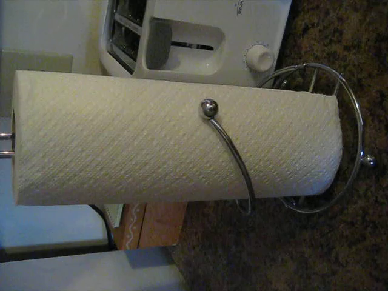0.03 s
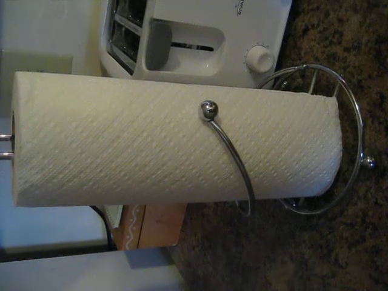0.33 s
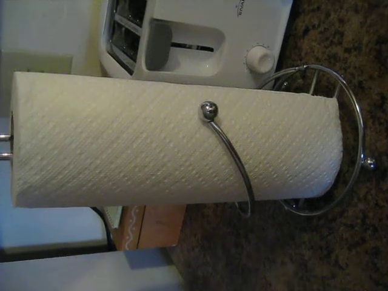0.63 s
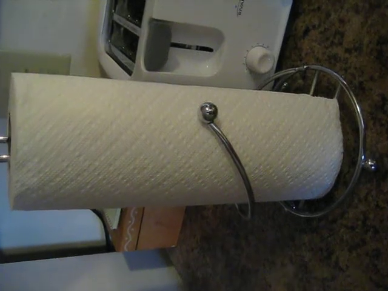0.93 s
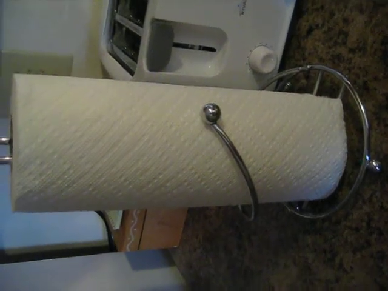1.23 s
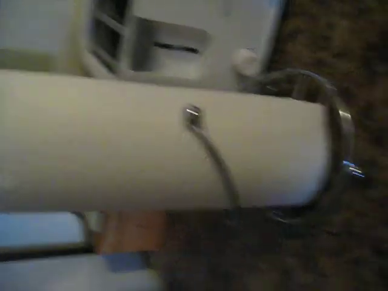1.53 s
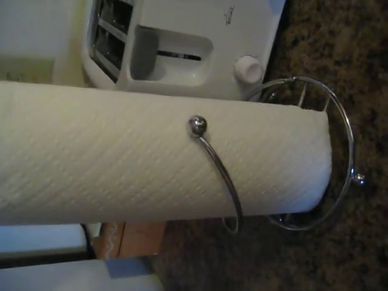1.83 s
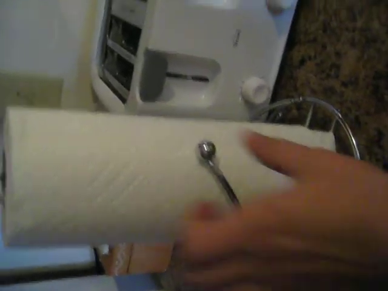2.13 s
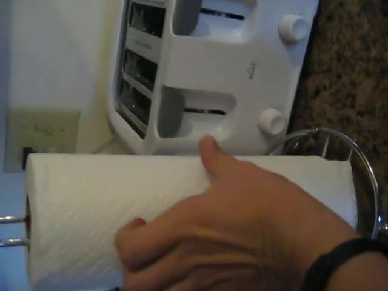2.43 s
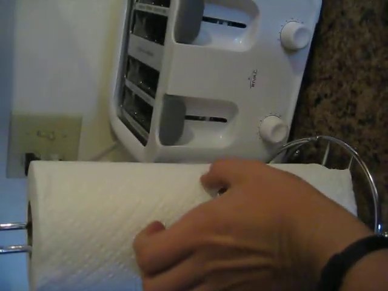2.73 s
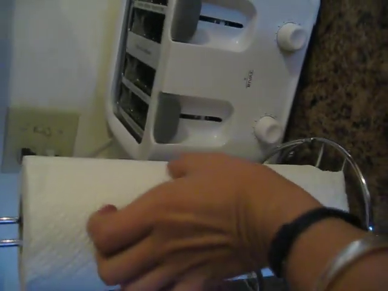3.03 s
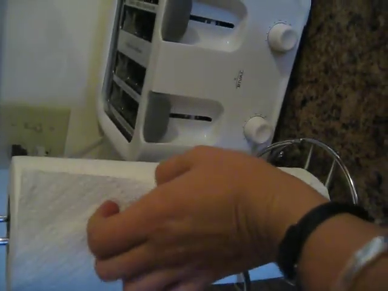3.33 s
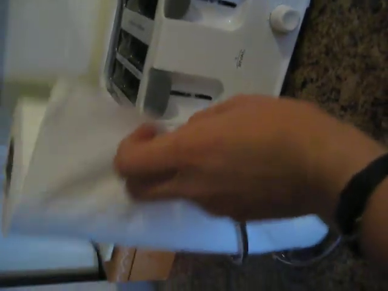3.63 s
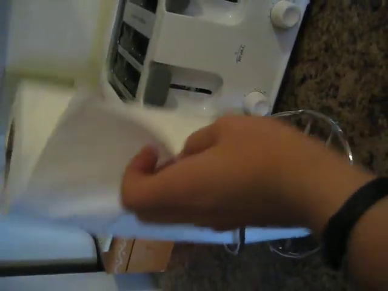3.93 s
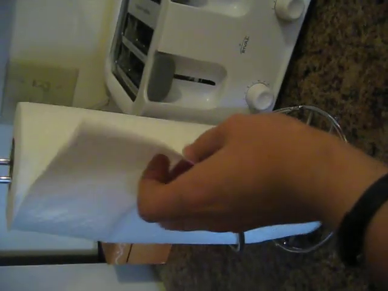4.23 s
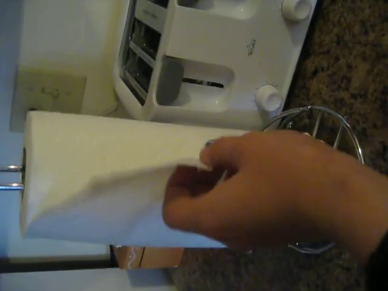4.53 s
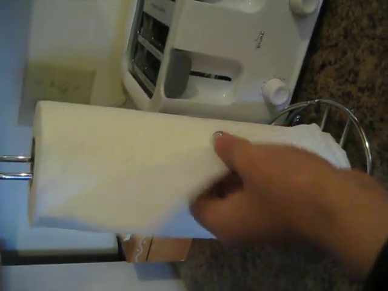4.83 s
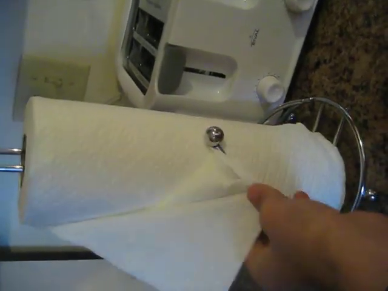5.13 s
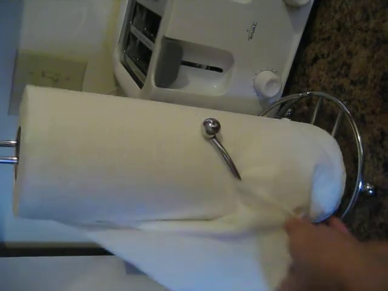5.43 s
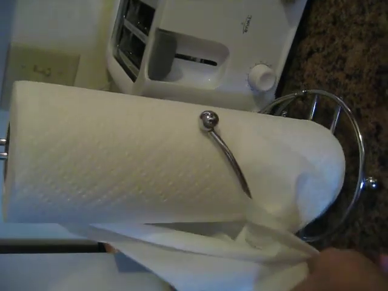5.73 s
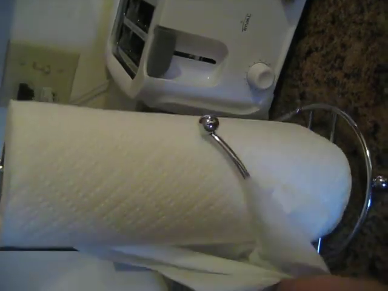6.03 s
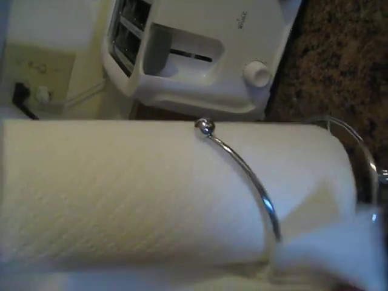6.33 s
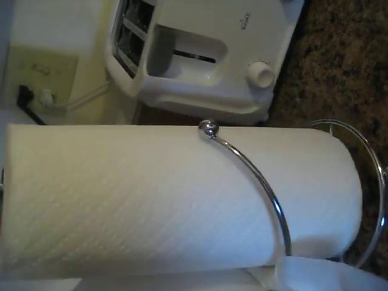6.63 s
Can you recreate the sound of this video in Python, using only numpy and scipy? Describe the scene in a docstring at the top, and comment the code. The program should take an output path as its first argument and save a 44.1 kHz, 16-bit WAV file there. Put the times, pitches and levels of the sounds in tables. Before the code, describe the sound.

A paper towel rustles off its roll as a wire holder knocks and rattles on a counter, then the sheet tears free.

```python
"""Tearing off a paper towel

A small camera clicks in someone's grip in a softly humming kitchen. Close by, a hand bumps a steel
wire towel holder, which tips and rattles back onto its base on the counter. The sheet rustles out
under the holder's arm, the roll scrapes round, and the perforation tears in a run of snaps."""
import sys
import numpy as np
from scipy import signal
from scipy.fft import rfft, irfft
from scipy.io import wavfile

SR = 44100
rng = np.random.default_rng(int(sys.argv[2]) if len(sys.argv) > 2 else 0)


def pcm_store(signal):
    """Save signal as 16-bit PCM."""
    levels = np.round(np.clip(np.atleast_2d(signal), -1, 1) * 32767)
    wavfile.write(sys.argv[1], SR, levels.astype(np.int16).T)


N = 303408
TIME = np.arange(N) / SR

# The thin hiss of paper fibres. Each row: frequency in Hz, relative level in dB.
HISS = [(300, -21), (2000, -3.5), (4200, 8.5), (6500, 5), (9500, 2), (12000, -0.5), (16000, -2)]


def amp(db):
    """Turn decibels (dB) into a number to multiply a sound by."""
    return 10 ** (np.asarray(db) / 20)


def unit(x):
    """Scale a signal to an average power of one."""
    return x / np.sqrt(np.mean(x ** 2) + 1e-20)


def fade(t, t60):
    """A dying sound's strength at time t: it drops 60 dB every t60 seconds, its fade time."""
    return np.exp(-np.log(1000) * t / t60)


def read(points, hz):
    """Look up a value between the rows of a frequency table."""
    f, value = np.transpose(points)
    return np.interp(np.log(hz + 1), np.log(f + 1), value)


def add(mix, s, sound):
    """Mix a sound in, starting at s seconds."""
    part = mix[round(s * SR):][:len(sound)]
    part += sound[:len(part)]


def colour(x, spectrum, corner_hz=np.inf, steepness=2, size=2048):
    """Give a sound the tone of a spectrum table, made duller above the corner frequency."""
    hz = abs(np.fft.fftfreq(size, 1 / SR))
    log_gain = np.log(amp(read(spectrum, hz))) - .5 * np.log(1 + (hz / corner_hz) ** steepness)
    response = np.exp(signal.hilbert(log_gain).conj())  # nothing sounds ahead of a hit
    taps = np.fft.ifft(response).real[:size // 2]
    return signal.oaconvolve(x, taps / np.linalg.norm(taps))[:len(x)]


def drift(hz):
    """A smooth random wobble that changes about hz times a second."""
    slow_only = np.exp(-(np.fft.rfftfreq(N, 1 / SR) / hz) ** 2)
    return unit(irfft(rfft(rng.standard_normal(N)) * slow_only, N))


def burst(t60, crack=0, count=16384):
    """A contact: quickly dying vibration, with an optional sharp crack at its start."""
    shake = rng.choice([-1., 1.], count) * fade(TIME[:count], t60)
    return shake + crack * signal.unit_impulse(count)


def ring(modes):
    """One blow starts all of an object's tones; their strength and sign vary with where it lands."""
    hz, db, t60 = np.transpose(modes)[:, :, None]
    t = TIME[:SR]
    size = amp(db + rng.standard_normal(hz.shape)) * rng.choice([-1., 1.], hz.shape)
    return (size * fade(t, t60) * np.sin(2 * np.pi * hz * t)).sum(0)


def background(air_db=-44, waver=0.98):
    """Still kitchen air with the slightly wavering hum of appliances."""
    # The tone of the air. Each row: frequency in Hz, relative level in dB.
    air_tone = [(20, -16), (55, -10), (80, -15.5), (100, -4.5), (125, -2.5), (175, -6.5), (310, -1),
                (400, -9.5), (470, -6.5), (640, -8), (1760, -14), (4800, -20.5), (9500, -33.5),
                (16000, -36.5)]
    # The appliance hum. Each row: pitch in Hz, average level in dB.
    hum_tones = [(58.6, -60.5), (301, -77), (550, -68.5)]
    air = amp(air_db) * unit(colour(rng.standard_normal(N), air_tone, size=16384))
    hum = sum(amp(db) * np.sqrt(2) * np.sin(2 * np.pi * hz * TIME + waver * drift(hz=3.4))
              for hz, db in hum_tones)
    return air + hum


def camera_clicks(rise_s=.00045):
    """Plastic parts shift by the microphone: a tick, a brief ring, a buzz and a ping of the shell."""
    # Each row is a click: start in seconds, relative ring level in dB, ring pitch in Hz,
    # ring fade time in seconds, then relative levels of tick, buzz and ping in dB.
    clicks = [(0.9788, 0, 2700, 0.0031, -10.5, -19.5, 5.5), (1.0506, -13.5, 2470, 0.0071, -45, -26, -12),
              (1.1825, 10.5, 2770, .0021, -15.5, -7.5, 0), (1.5594, -36, 1610, .011, -36, -40, -30),
              (1.5791, -27, 2650, 0.0091, -29, -48, -20)]
    # The thin shell's tones. Each row: pitch in Hz, relative level in dB, fade time in seconds.
    shell = [(2790, -42, .1), (2930, -43, .09)]
    # Each pair: frequency in Hz, relative level in dB.
    buzz_tone = [(150, -28), (550, -10.5), (1500, -7), (2750, 3), (4200, -8.5), (16000, -27.5)]
    tick_tone = [(200, -22), (1500, -7.5), (4500, 7.0), (7000, 1.5), (10000, 3.0), (16000, -18)]
    out, t = np.zeros(N), TIME[:8192]
    for s, db, hz, t60, tick_db, buzz_db, ping_db in clicks:
        onset = 1 - np.exp(-(t / rise_s) ** 2)
        swing = np.cos(2 * np.pi * hz * t) * fade(t, t60) * onset
        cycles = np.diff(swing, prepend=0) * SR / (2 * np.pi * hz)  # small parts give off little bass
        buzz = colour(burst(t60=.011, crack=2.9), buzz_tone)
        tick = colour(burst(t60=.0038, crack=3.8), tick_tone)
        add(out, s, 2 * amp(db) * cycles)
        add(out, s, amp(ping_db) * ring(shell))
        add(out, s + rise_s, amp(buzz_db) * buzz + amp(tick_db) * tick)
    return out


def holder_clacks(contacts):
    """Each knock of the holder starts as a short clack, brighter when the contact is hard."""
    # The tone of a clack. Each row: frequency in Hz, relative level in dB.
    clack_tone = [(40, -17), (120, -9), (260, -11), (400, -4), (800, 4), (1450, 4.5), (2000, 2.5),
                  (2700, -3), (4200, -7), (7000, -17.5), (11000, -19), (16000, -22)]
    out = np.zeros(N)
    for s, db, corner_hz, t60, *_ in contacts:
        add(out, s, amp(db) * colour(burst(t60, crack=4.7), clack_tone, corner_hz, steepness=2.66))
    return out


def holder_ring(contacts, low_cut_hz=200):
    """The knocks leave the wire frame, the base and the hollow roll ringing, with little bass."""
    # The tones of each part. Each row: pitch in Hz, relative level in dB, fade time in seconds.
    frame = [(470, -4, .38), (555, -13, .36), (737, -9, .3), (808, -7, .2), (846, 1, .26), (862, 4, .32),
             (880, 5, .035), (908, 3, .52), (1102, -12, .35), (1312, -11, .18), (1378, -5, .28),
             (1420, 2, .025), (1452, -9, .3), (1520, -7, .26), (1716, -13, .25), (1776, -11, .28),
             (1904, -7, .22), (2060, -5, .06), (2140, -9, .16)]
    base = [(431, 1, .7), (617, -6, .45), (701, -3, .35), (771, 1, .45), (985, -5, .3), (1028, -2, .35),
            (1052, -4, .35), (1116, -3, .55), (1246, -4, .35), (1361, 0, .35), (1454, 2, .5),
            (1798, -6, .35), (1866, -3, .33), (1989, -7, .33), (2245, -6, .33), (2627, -12, .3),
            (3074, -13, .3)]
    roll = [(215, -13, .16), (349, 1, .16), (606, -11, .08)]
    out = np.zeros(N)
    for s, *_, frame_db, base_db, roll_db in contacts:
        add(out, s, amp(frame_db) * ring(frame) + amp(base_db) * ring(base) + amp(roll_db) * ring(roll))
    return signal.lfilter(*signal.butter(2, low_cut_hz, "high", fs=SR), out)


def stroke(start, rise, length, release_t60=0.51):
    """The strength of one hand stroke: the sheet speeds up, keeps moving and comes to rest."""
    t = TIME - start
    return np.clip(t / rise, 0, 1) * fade(np.clip(t - length, 0, 2 * release_t60), release_t60)


def fibres(per_s, spread_db):
    """Countless tiny slips of paper fibres, at random moments and of random sizes."""
    size = amp(spread_db * np.minimum(rng.exponential(1, N), 4))
    return unit(size * rng.standard_normal(N) * (rng.random(N) < per_s / SR))


def sliding_sheet(hiss_db=6.0, rustle_db=2.5, flutter_db=1.2, crinkle_db=-12):
    """The bumpy sheet slides over skin, wire and itself, catching unevenly and crinkling."""
    # Fingers find and lift the edge, draw the sheet out, pull it tight and carry it off.
    # Each row: start, rise time and length in seconds, then relative rustle and hiss levels in dB.
    strokes = [(2.766, 0.1, .19, -51.5, -56), (3.068, 0.032, 0.16, -49.5, -65),
               (3.276, 0.071, 0.12, -47.5, -54.5), (3.44, 0.069, 0.18, -48, -57.5),
               (3.70, .06, 0.13, -45, -53.5), (3.923, 0.09, 0.21, -47, -56), (4.215, 0.045, .06, -51, -61),
               (4.658, 0.074, 0.27, -50.5, -55.5), (4.894, 0.091, 0.18, -43.5, -50),
               (5.168, 0.078, 0.12, -45, -53), (5.278, 0.032, 0.28, -39.5, -48.5),
               (5.30, 0.082, .18, -38, -43), (5.625, 0.13, 0.28, -42, -50),
               (5.919, 0.074, 0.25, -42.5, -50.5), (6.136, 0.094, 0.15, -34, -44),
               (6.423, 0.04, 0.058, -45, -52), (6.553, 0.022, 0.15, -46.5, -57),
               (6.727, 0.051, 0.16, -52.5, -58.5)]
    # The tone of the rustle. Each row: frequency in Hz, relative level in dB.
    rustle_tone = [(100, -24.5), (400, -7.5), (1000, -0.5), (2400, 1), (4000, 1), (6000, -6), (9000, -19),
                   (16000, -26)]
    power = np.array([stroke(start, rise, length) for start, rise, length, *_ in strokes]) ** 2
    rustle_strength, hiss_strength = np.sqrt(amp([row[3:] for row in strokes]).T ** 2 @ power)
    slips = fibres(per_s=18000, spread_db=0) + amp(crinkle_db) * fibres(per_s=350, spread_db=1.5)
    slips *= amp(flutter_db * drift(hz=40))
    hiss = amp(hiss_db) * hiss_strength * colour(slips, HISS)
    rustle = amp(rustle_db) * rustle_strength * colour(slips, rustle_tone)
    return hiss + rustle


def sheet_snaps(tear):
    """The sheet's edge catches and flicks free; pulled tight, the sheet buckles and tears."""
    # Dry, thin flicks. Each row: start in seconds, level in dB, fade time in seconds.
    flicks = [(3.652, -28.5, .022), (5.305, -26.5, .04)]
    # Single snaps. Each row: start in seconds, level in dB, corner in Hz, fade time in seconds.
    snaps = [(5.331, -22, 1000, 0.063), (6.3100, -14.5, 5000, 0.028), (6.3182, -17.5, 4000, 0.063),
             (6.6225, -17.5, 1600, 0.023)]
    # The tone of a snap. Each row: frequency in Hz, relative level in dB.
    snap_tone = [(60, -28), (300, -7.5), (650, -2.5), (1100, 6.5), (1800, 2), (4000, 0), (7000, -7.5),
                 (11000, -15), (16000, -9)]
    out = np.zeros(N)
    for s, db, corner_hz, t60 in snaps + tear:
        add(out, s, amp(db) * colour(burst(t60, crack=1.5), snap_tone, corner_hz))
    for s, db, t60 in flicks:
        add(out, s, amp(db) * colour(burst(t60), HISS))
    return out


def rocking(count=7, start_s=4.042, gap_s=.0222, scatter_s=.001193, t60=.091):
    """List the quick, ever softer and duller knocks of the holder as it rocks to rest."""
    first_db, drop_db = -18, 6.5
    frame_db, base_db, roll_db = -22.5, -16, -19  # ringing, relative to each knock
    times = start_s + gap_s * np.arange(count) + scatter_s * rng.standard_normal(count)
    levels = first_db - drop_db * np.linspace(0, 1, count) ** 3
    corners_hz = np.geomspace(2960, 1180, count)
    return [(s, db, hz, t60, db + frame_db, db + base_db, db + roll_db)
            for s, db, hz in zip(times, levels, corners_hz)]


def turning_roll(level_db=-1, spin_up_db_per_s=190):
    """The cardboard core scrapes round the post, sounding through the roll; tugs spin it, then it slows."""
    # Each row is a tug: moment of full speed in seconds, relative level in dB, fade in dB per second.
    tugs = [(5.05, -46.5, 97), (5.35, -36, 100), (5.83, -35.5, 35), (6.26, -32.5, 101)]
    # The hollow tone of the scrape. Each row: frequency in Hz, relative level in dB.
    scrape_tone = [(100, -19), (300, -7), (480, 1), (620, -13), (790, 6), (1020, 2), (1220, -8), (1450, 4),
                   (1800, -13), (3000, -28), (8000, -43)]
    tug_levels = [top_db - np.maximum(spin_up_db_per_s * (s - TIME), slowing * (TIME - s))
                  for s, top_db, slowing in tugs]
    scrape = colour(fibres(per_s=2300, spread_db=-1.5), scrape_tone)
    return amp(level_db + np.max(tug_levels, axis=0)) * scrape


def tearing(count=7, start_s=6.2075, gap_s=.0122, scatter_s=.0008, t60=.039):
    """List the snaps as the perforation parts tab by tab, weaker and duller as the sheet goes slack."""
    times = start_s + gap_s * np.arange(count) + scatter_s * rng.standard_normal(count)
    levels_db = np.linspace(-14, -24, count)
    corners_hz = np.geomspace(2400, 1300, count)
    return [(s, db, hz, t60) for s, db, hz in zip(times, levels_db, corners_hz)]


def kitchen_echo(x, build_up_s=0.011, dull_hz=3600):
    """Echoes from the counter and cupboards blend into a tail whose treble dies first."""
    # How long the kitchen rings. Each row: frequency in Hz, fade time in seconds.
    fade_times = [(100, 0.71), (400, 0.88), (1200, 0.56), (2500, 0.52), (5000, 0.41), (12000, 0.45)]
    echoes = rng.standard_normal(SR) * (rng.random(SR) < .1)
    echoes *= 1 - np.exp(-TIME[:SR] / build_up_s)
    hz, t, bands = signal.stft(echoes, SR, nperseg=256)
    bands *= fade(t, read(fade_times, hz)[:, None])
    tail = signal.istft(bands, SR, nperseg=256)[1]
    tail = signal.lfilter(*signal.butter(1, dull_hz, fs=SR), tail / np.linalg.norm(tail))
    return signal.fftconvolve(x, tail)[:N]


def scene(clack_echo_db=-5, paper_echo_db=-10, click_echo_db=-28):
    """Clacks and paper echo in the kitchen; the camera's own clicks hardly echo at all."""
    # The holder's knocks. Each row: start in seconds, clack level in dB, corner in Hz (higher is
    # harder), clack fade time in seconds, then relative ring levels of frame, base and roll in dB.
    knocks = [(2.4805, -18, 2400, 0.052, -34.5, -52, -47), (3.7668, -21, 3000, 0.087, -37, -58, -21),
              (3.8070, -17.5, 1700, 0.043, -42, -54, -37), (3.8128, -12.5, 2000, .03, -25.5, -53, -49),
              (4.0020, -4.5, 4360, 0.032, -42, -36, -36), (4.0280, -8.5, 4200, .042, -43, -29.5, -36)]
    contacts = knocks + rocking()
    clacks = holder_clacks(contacts)
    paper = sliding_sheet() + sheet_snaps(tearing()) + turning_roll()
    clicks = camera_clicks()
    echo = kitchen_echo(amp(clack_echo_db) * clacks + amp(paper_echo_db) * paper
                        + amp(click_echo_db) * clicks)
    return (clacks + holder_ring(contacts) + paper + clicks + echo + background())[None]


def record(dry, start_s=.073, ceiling=.8, notch_hz=7930, notch_width_hz=1300, top_hz=15900):
    """After an instant of silence, the camera rounds off loud peaks and trims parts of the treble."""
    x = dry * (TIME > start_s)
    x = x / (1 + (x / ceiling) ** 4) ** .25
    x = signal.lfilter(*signal.iirnotch(notch_hz, notch_hz / notch_width_hz, SR), x)
    low_pass = signal.firwin(511, top_hz, window=("kaiser", 9), fs=SR)
    return signal.oaconvolve(x, low_pass[None], "same")


dry = scene()
out = record(dry)
pcm_store(out)
```